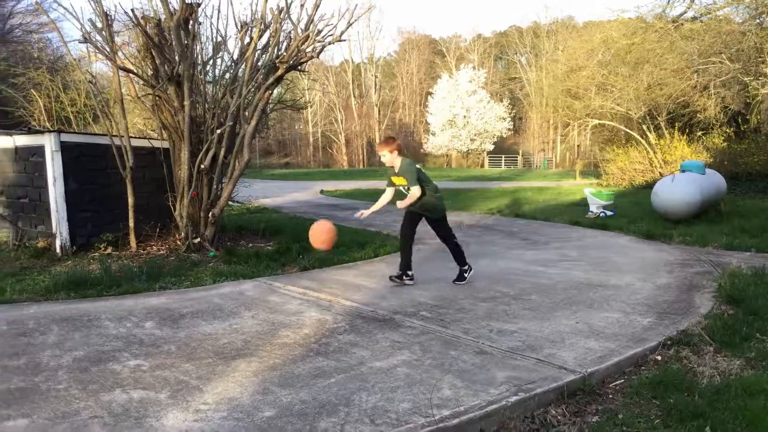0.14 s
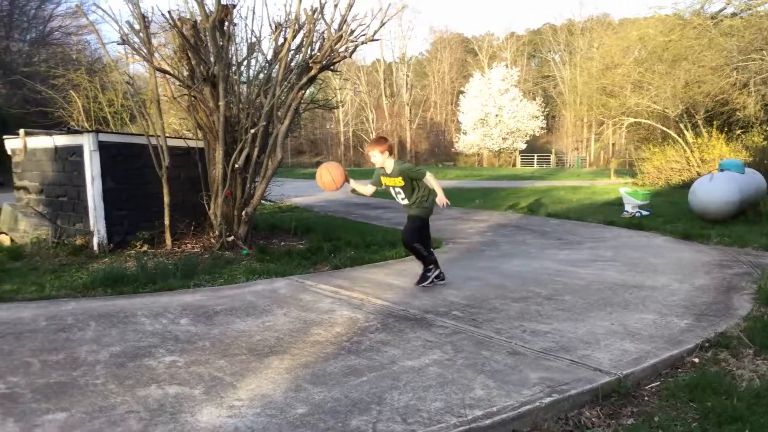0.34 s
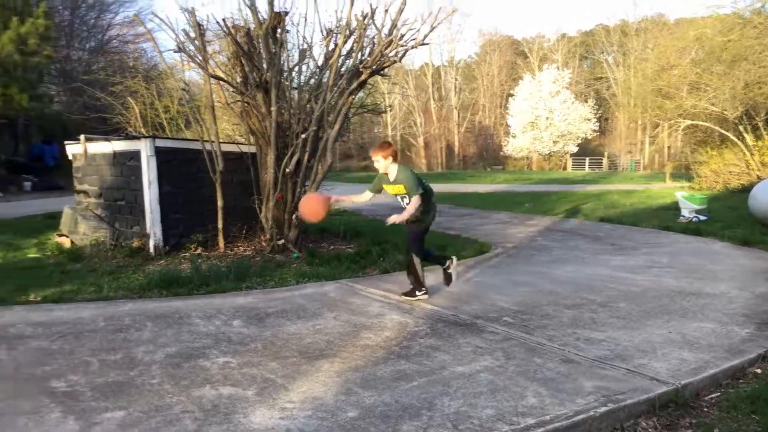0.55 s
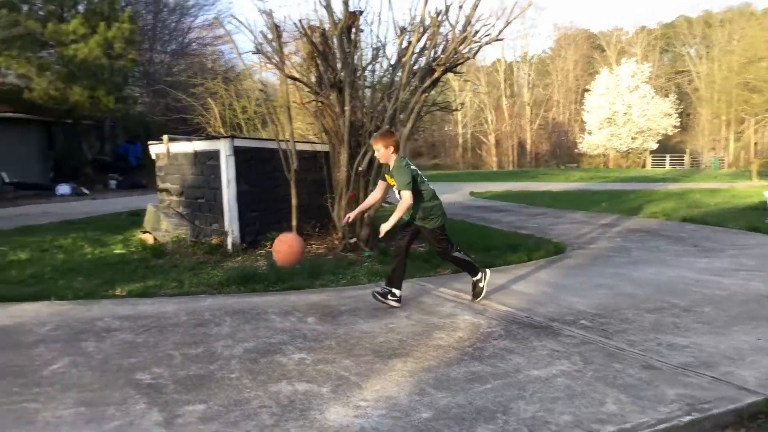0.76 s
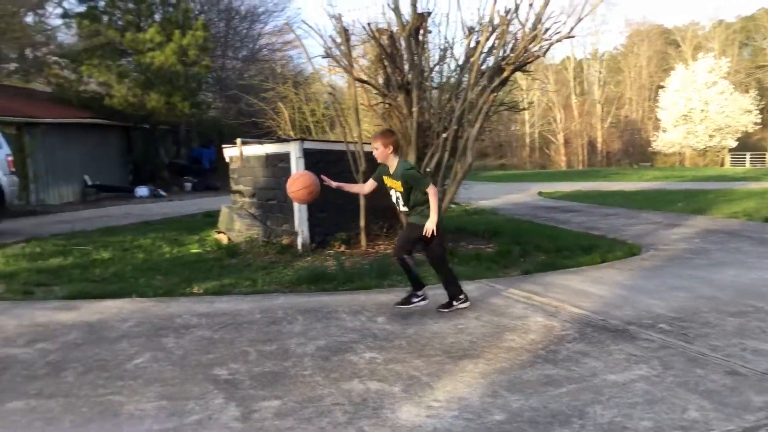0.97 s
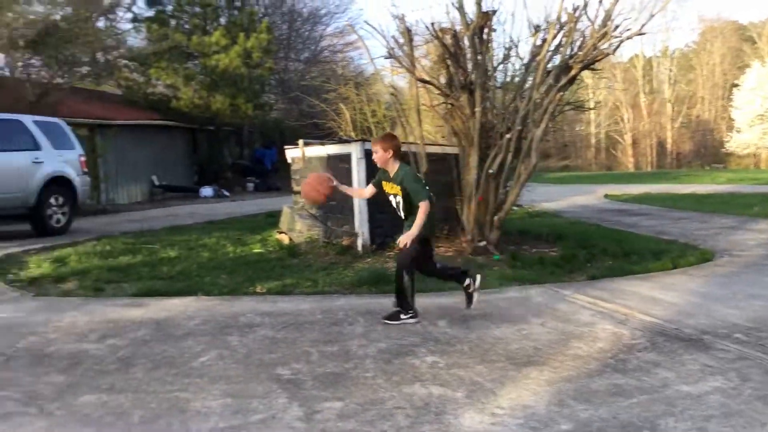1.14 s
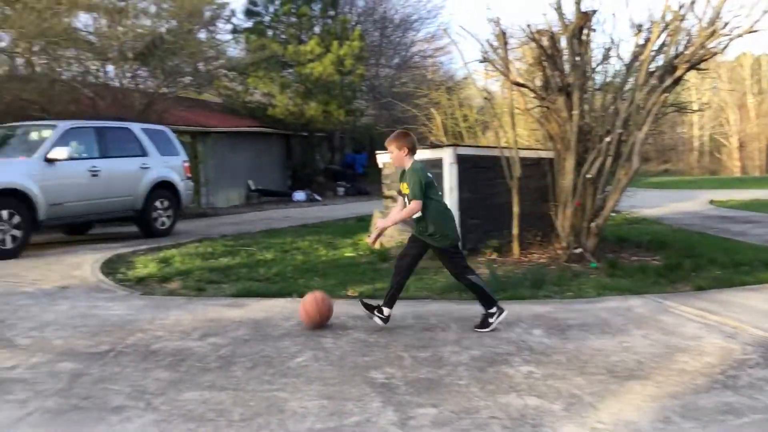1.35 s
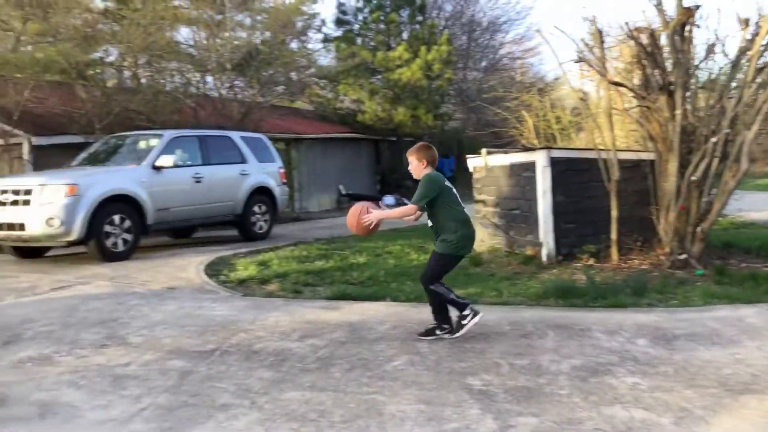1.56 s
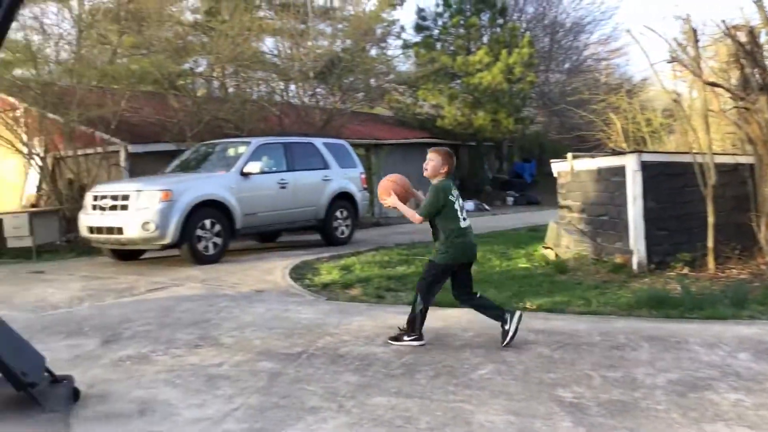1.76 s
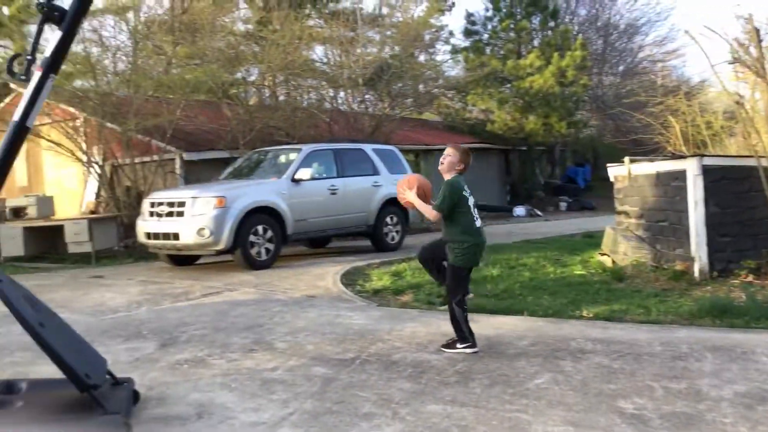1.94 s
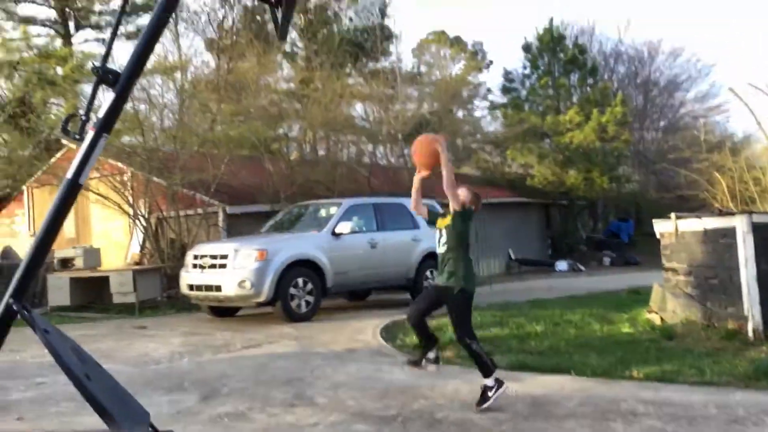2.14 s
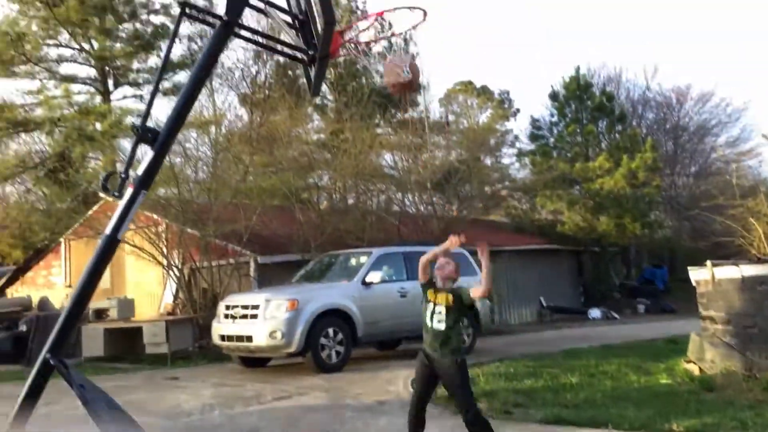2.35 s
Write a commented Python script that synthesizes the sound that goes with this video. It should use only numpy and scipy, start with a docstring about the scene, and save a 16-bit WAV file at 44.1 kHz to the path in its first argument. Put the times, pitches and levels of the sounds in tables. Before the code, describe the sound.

A basketball bounces three times on a concrete driveway, each a sharp thump with a brief echo. Hands catch it with a slap and light footsteps scuff on, over quiet outdoor air and a faint low hum.

```python
"""A concrete drive: a basketball is dribbled three times, caught and carried a few steps.
Each bounce is a crack of the skin, a deep thump of the inflated shell and echoes from sheds and trees.
Palms slap the ball, soles scuff the grit, heels thud and clothes rustle.
A low hum swells over quiet outdoor air."""
import sys
import numpy as np
from scipy import signal
from scipy.fft import rfft, irfft
from scipy.io import wavfile
from scipy.ndimage import uniform_filter1d

SR = 44100
rng = np.random.default_rng(int(sys.argv[2]) if len(sys.argv) > 2 else 0)


def materialize(psi):
    """Save the field psi as 16-bit PCM at rate SR to the path in sys.argv[1].

    A 1-D psi becomes a single channel; in a 2-D psi each row is a channel.
    """
    bounded = np.clip(np.atleast_2d(psi).T, -1, 1)
    quanta = np.round(bounded * 32767).astype(np.int16)
    wavfile.write(sys.argv[1], SR, quanta)


N = 105840
T = np.arange(N) / SR


def undb(db):
    """Decibels to gain."""
    return 10 ** (np.asarray(db) / 20)


def peak(x, db):
    """Scale to a peak level."""
    return x * undb(db) / np.abs(x).max()


def band(x, hz, width_hz):
    """Resonance, gain 1 at the centre."""
    return signal.lfilter(*signal.iirpeak(min(hz, .45 * SR), hz / width_hz, fs=SR), x)


def body(x, resonances, tilt_db_per_decade=0):
    """Resonances summed with alternate signs, tilted about 2 kHz."""
    return sum((-1) ** k * undb(db + tilt_db_per_decade * np.log10(hz / 2000)) * band(x, hz, width_hz)
               for k, (hz, width_hz, db) in enumerate(resonances))


def walk(rate_hz):
    """Random levels held for 1 / rate_hz, smoothed twice."""
    hold = int(SR / rate_hz)
    levels = np.repeat(rng.standard_normal(N // hold + 1), hold)
    return 1.604 * uniform_filter1d(uniform_filter1d(levels, hold), hold)[:N]


def fade(start_s, decay_s, rise_s=.00028):
    """Quick rise, exponential fall."""
    age_s = np.maximum(T - start_s, 0)
    return (1 - np.exp(-age_s / rise_s)) * np.exp(-age_s / decay_s)


def arch(start_s, length_s):
    """Half-sine envelope."""
    return np.sin(np.pi * np.clip((T - start_s) / length_s, 0, 1))


def ring(start_s, hz, t60_s):
    """A softly pushed mode."""
    return fade(start_s, t60_s / np.log(1000), rise_s=.0015) * np.sin(2 * np.pi * hz * (T - start_s))


def air():
    """Outdoor air: half-octave noise bands swell together and flicker alone; the lows rise and fall."""
    # air spectrum (frequency [Hz], relative density [dB])
    spectrum = [(15, -32.5), (30, -21), (55, 7.5), (95, 5.5), (200, -1), (260, -5.5), (330, -13.5),
                (480, -24), (700, -18), (1200, -21), (1700, -21.5), (2600, -28), (4500, -34), (7000, -40),
                (13000, -42.5), (16500, -51)]
    # rumble contour (time [s], level [dB])
    rumble = [(0, -84), (.3, -47.5), (0.499, -63), (0.651, -56), (1.1, -60), (1.3, -57.5), (1.8, -56.5),
              (2.1, -57), (2.4, -64.5)]
    rumble_ref_db, rumble_top_hz = -57, 330
    rumble_db = np.interp(T, *np.array(rumble).T) - rumble_ref_db
    swell_db = .6 * walk(1)
    knot_hz, knot_db = np.array(spectrum).T
    bin_hz = np.fft.rfftfreq(N, 1 / SR) + 1
    colour = undb(np.interp(np.log(bin_hz), np.log(knot_hz), knot_db))
    noise = rfft(rng.standard_normal(N)) * colour
    noise *= undb(-48.5) / np.std(irfft(noise, N))
    out = np.zeros(N)
    for k in range(-1, 21):
        share = np.cos(np.pi / 2 * np.clip(2 * np.log2(bin_hz / 20) - k, -1, 1)) ** 2
        flicker_db = walk(14)
        is_low = 20 * 2 ** (k / 2) < rumble_top_hz
        out += undb(swell_db + flicker_db + rumble_db * is_low) * irfft(noise * share, N)
    return out


def hum():
    """A low wavering tone with a weak octave, perhaps a distant engine."""
    # hum contour (time [s], pitch [Hz], level [dB])
    contour = [(0, 89, -32.5), (.1, 84.2, -47.5), (.17, 83.4, -32.5), (.3, 81.8, -43.5), (.45, 84.8, -48.5),
               (.6, 82.2, -52), (.8, 80, -61), (.97, 79.9, -58), (1.1, 79.4, -45), (1.2, 78.66, -40),
               (1.35, 78.6, -38.5), (1.48, 80.8, -36.5), (1.62, 78.9, -33), (1.7, 79.4, -58),
               (1.82, 77.16, -45), (1.95, 78.6, -54.5), (2.2, 79, -60), (2.4, 78, -54)]
    time_s, hz, db = np.array(contour).T
    pitch_hz = np.interp(T, time_s, hz) * (1 + .01 * walk(10))
    phase = 2 * np.pi * np.cumsum(pitch_hz) / SR
    amplitude = np.sqrt(2) * undb(np.interp(T, time_s, db) + 3.5 * walk(45))
    octave_db = -17 + 3.5 * walk(6.1)
    return amplitude * (np.sin(phase) + undb(octave_db) * np.sin(2 * phase))


def rustle():
    """Clothes and dragged soles: soft swells of treble noise."""
    # rubs (start [s], length [s], gain [dB])
    rubs = [(0.098, 0.029, -69), (0.697, 0.055, -67), (0.891, 0.068, -55), (1.027, 0.048, -75.5),
            (1.202, 0.092, -61), (1.396, 0.025, -69), (1.806, 0.073, -66), (1.879, 0.083, -62),
            (2.27, 0.12, -75)]
    envelope = sum(undb(db) * arch(start_s, length_s) for start_s, length_s, db in rubs)
    return envelope * undb(walk(130)) * band(rng.standard_normal(N), hz=11000, width_hz=8000)


def steps():
    """Grit crunches under each sole and drags on; the heel thuds."""
    # scuffs (time [s], gain [dB], burst [s], drag re burst [dB], drag decay [s], tilt [dB/decade],
    # heel thud [dB])
    scuffs = [(0.309, -30.5, 0.0063, -16, 0.018, 7.5, -39.5), (0.609, -37.5, .014, -6.5, 0.029, 6.5, -39),
              (1.07, -49, 0.0046, -3.5, 0.012, -4, -45), (1.2343, -44.5, 0.0071, -13, .04, 9, -51),
              (1.601, -48.5, 0.0023, -40.5, 0.012, 12, -66), (1.807, -43, 0.011, -5, 0.044, -6, -39.5),
              (1.94, -48, 0.009, -13, 0.033, -16, -38.5), (2.145, -57.5, 0.0052, -8.5, 0.025, -5, -54.5),
              (2.36, -53, 0.0036, 4, 0.026, -8, -63)]
    # grit resonances (centre [Hz], width [Hz], gain [dB])
    grit_bands = [(600, 130, 3.5), (1956, 1000, -2), (4200, 2500, -6), (8000, 2500, -6.5),
                  (12200, 4000, -8)]
    out = np.zeros(N)
    for start_s, db, burst_s, drag_db, drag_s, tilt, thud_db in scuffs:
        grit = rng.standard_normal(N) * undb(3 * walk(1500))
        envelope = arch(start_s, burst_s) + undb(drag_db) * fade(start_s, drag_s, rise_s=.0035)
        out += undb(db) * body(grit * envelope, grit_bands, tilt)
        out += undb(thud_db) * ring(start_s, hz=170, t60_s=.14)
    return out


def yard_tail(start_s, gain_db):
    """Scattered, lumpy reflections of one hit, dying band by band."""
    # yard reverberation (centre [Hz], gain [dB], t60 [s])
    tail_bands = [(130, 8, 1), (250, 9.5, 0.38), (500, -6, 0.31), (950, 0, .3), (1600, -7.5, 0.4),
                  (2440, -11, .4), (4200, -10, .35), (6500, -29, 0.23), (9600, -26.5, 0.35),
                  (13500, -25, .22)]
    lumps = undb(gain_db + 1.6 * walk(300))
    out = np.zeros(N)
    for hz, db, t60_s in tail_bands:
        width_hz = .81 * hz
        noise = band(band(rng.standard_normal(N), hz, width_hz), hz, width_hz)
        out += undb(db) * noise * fade(start_s, t60_s / np.log(1000), rise_s=.0013)
    return lumps * out


def lift_offs_and_echoes():
    """Short noise bursts just after each hit: the ball peeling off the ground, then nearby echoes."""
    # lift-off and echo bursts (time [s], peak [dB], centre [Hz], width [Hz], smear [s])
    bursts = [(.2365, -26.5, 1300, 800, 0.0049), (0.2476, -33, 3000, 3940, 0.007),
              (0.335, -42.5, 2000, 2000, 0.0025), (.357, -44, 2300, 1200, .004),
              (.857, -27.5, 2500, 3000, 0.0036), (.864, -38.5, 11000, 8000, 0.00084),
              (0.8743, -29.5, 3500, 5000, 0.005), (.980, -42.5, 2200, 2400, 0.0037),
              (1.017, -48.5, 3500, 2930, 0.00158), (1.512, -23, 1200, 1500, 0.0022),
              (1.52, -35.5, 5800, 2500, 0.0046), (1.528, -22.5, 3500, 6000, 0.0015),
              (1.619, -31, 1800, 1300, 0.0014), (1.6242, -32, 1900, 1960, 0.0012)]
    out = np.zeros(N)
    for start_s, db, hz, width_hz, smear_s in bursts:
        burst = rng.standard_normal(N) * fade(start_s, smear_s, smear_s / 2)
        out += peak(band(band(burst, hz, width_hz), hz, width_hz), db)
    return out


def slap(start_s, resonances, peak_db, tilt_db_per_decade=0):
    """Contact with the skin: a tick and a short burst ring the resonances."""
    tick = np.exp(-((T - start_s - .0001) / 2e-5) ** 2)
    burst = undb(-11) * rng.standard_normal(N) * fade(start_s, decay_s=.001)
    return peak(body(burst - tick, resonances, tilt_db_per_decade), peak_db)


def thump(start_s, gain_db, pitch_ratio=1, squashed_db=0):
    """The inflated shell rings high while squashed, low once freed."""
    # shell modes (frequency [Hz], gain [dB], t60 [s], delay [s])
    modes = [(182, 0.5, 0.049, 0.0013), (106.7, 0, .08, .0072), (252.2, -17.5, 0.16, .003),
             (687, -14.5, 0.03, 0.0025)]
    contact_s = .005
    out = np.zeros(N)
    for hz, db, t60_s, delay_s in modes:
        gain = undb(gain_db + db + squashed_db * (delay_s < contact_s))
        out += gain * ring(start_s + delay_s, hz * pitch_ratio, t60_s)
    return out


def catch():
    """Two palms close on the ball: slap, thump and yard tail."""
    # palm contacts (time [s], slap peak [dB], thump [dB], tail [dB])
    contacts = [(1.5894, -18.5, -61.5, -41), (1.5921, -20.5, -21.5, -35.5)]
    # palm slap resonances (centre [Hz], width [Hz], gain [dB])
    palm = [(650, 260, 1), (1300, 255, 6), (1900, 698, -1.5), (4040, 1700, -11), (6240, 2500, -18),
            (12100, 4000, -25)]
    return sum(slap(start_s, palm, slap_db) + thump(start_s, thump_db) + yard_tail(start_s, tail_db)
               for start_s, slap_db, thump_db, tail_db in contacts)


def bounces():
    """The ball hits concrete: the skin cracks, the shell thumps, the yard answers."""
    # hits (time [s], crack peak [dB], tilt [dB/decade], skin pitch [ratio], main ring lift [dB],
    # thump [dB], squashed-mode gain [dB], shell pitch [ratio], tail [dB])
    hits = [(.224, -8, -5.5, 1.018, 8, -8.5, -0.5, 1.04, -26), (.848, -3, 4.5, 0.98, 1, -9, 0, 1.0, -23),
            (1.4991, -7, 9.5, 0.92, 2, -11, -1.5, .97, -24.5)]
    # skin resonances (centre [Hz], width [Hz], gain [dB])
    skin = [(700, 210, -7.5), (1300, 260, -1.5), (2200, 246, 2), (4190, 940, -3.5), (6420, 380, -7),
            (7800, 1800, -10), (9740, 900, -7.5), (11000, 890, -9.5), (13270, 1100, -17), (14500, 890, -28)]
    main_ring_row = 3
    out = np.zeros(N)
    for start_s, crack_db, tilt, skin_ratio, lift_db, thump_db, squashed_db, shell_ratio, tail_db in hits:
        tuned_skin = [(hz * skin_ratio, width_hz, db + lift_db * (k == main_ring_row))
                      for k, (hz, width_hz, db) in enumerate(skin)]
        out += slap(start_s, tuned_skin, crack_db, tilt)
        out += thump(start_s, thump_db, shell_ratio, squashed_db)
        out += yard_tail(start_s, tail_db)
    return out


def scene():
    """Ball and feet over hum and air, mono."""
    return (bounces() + lift_offs_and_echoes() + catch() + steps() + rustle() + hum() + air())[None]


def record(dry):
    """Phone microphone: trims the deep bass, colours the sound, cuts the top."""
    # microphone and housing peaks and dips (centre [Hz], width [Hz], gain [dB])
    response = [(400, 150, -4), (950, 120, -8), (2200, 600, 4), (3250, 500, -8), (4300, 800, 5),
                (5300, 600, -10)]
    low_cut_hz, top_hz = 45, 16500
    x = signal.sosfilt(signal.butter(2, low_cut_hz, "high", fs=SR, output="sos"), dry)
    for hz, width_hz, db in response:
        x = x + (undb(db) - 1) * band(x, hz, width_hz)
    return signal.sosfilt(signal.ellip(10, .2, 80, top_hz, fs=SR, output="sos"), x)


dry = scene()
out = record(dry)
materialize(out)
```